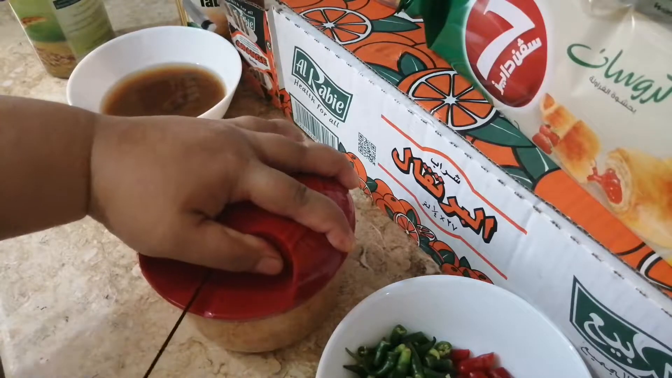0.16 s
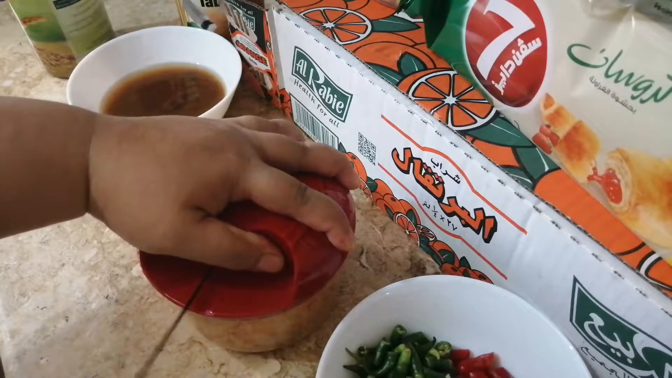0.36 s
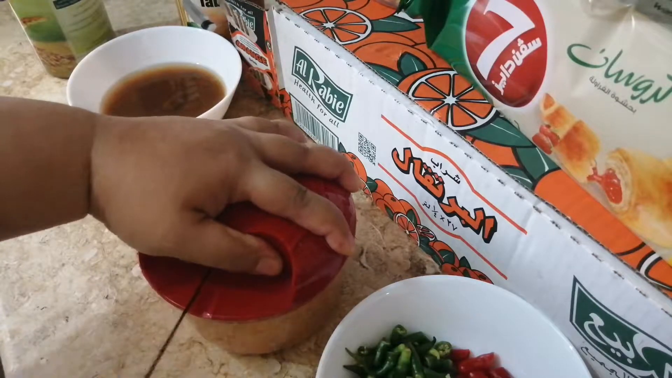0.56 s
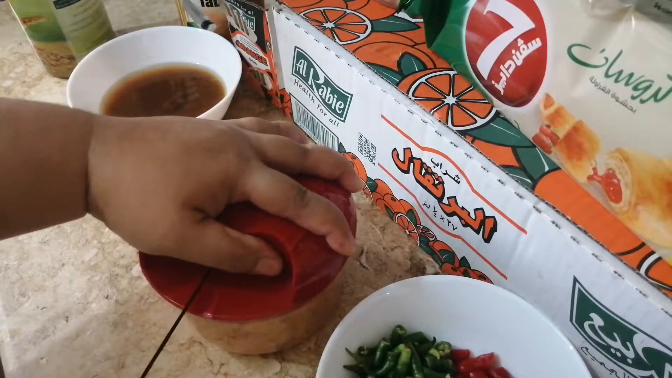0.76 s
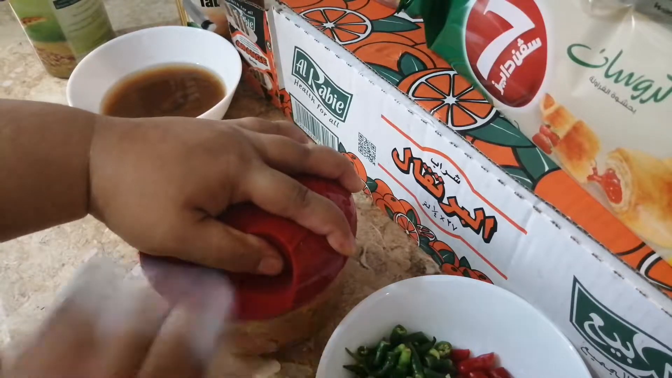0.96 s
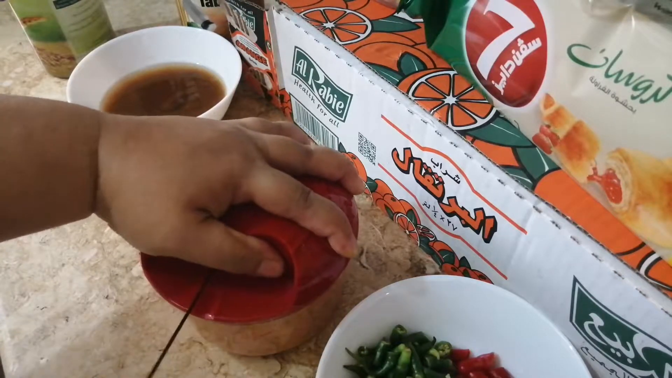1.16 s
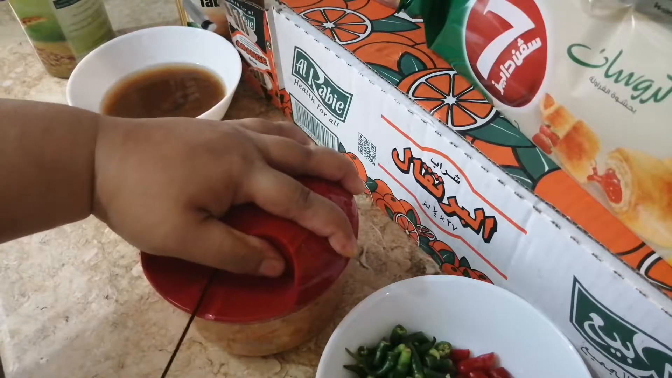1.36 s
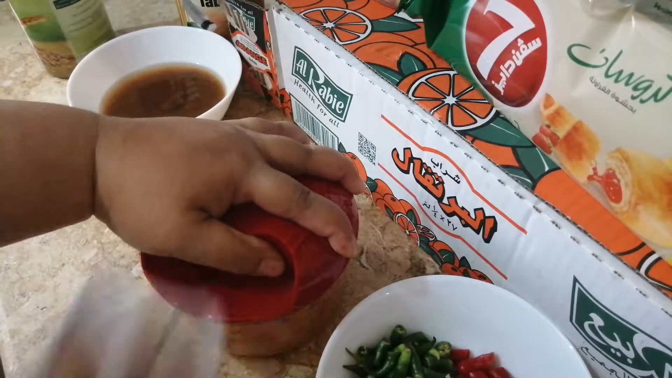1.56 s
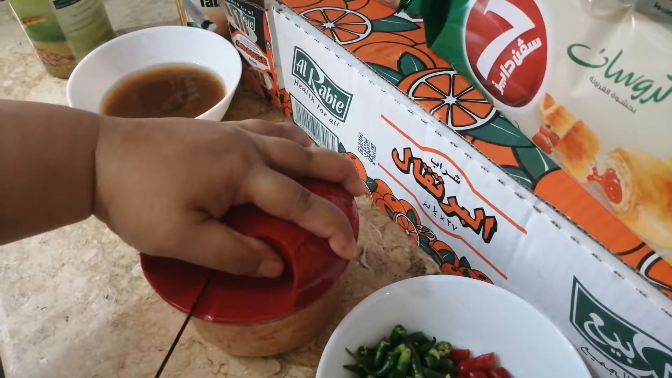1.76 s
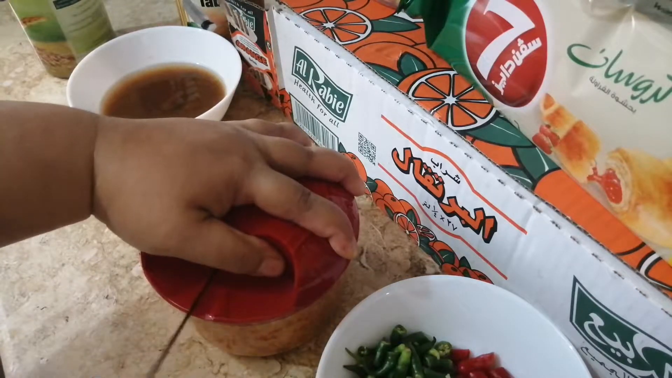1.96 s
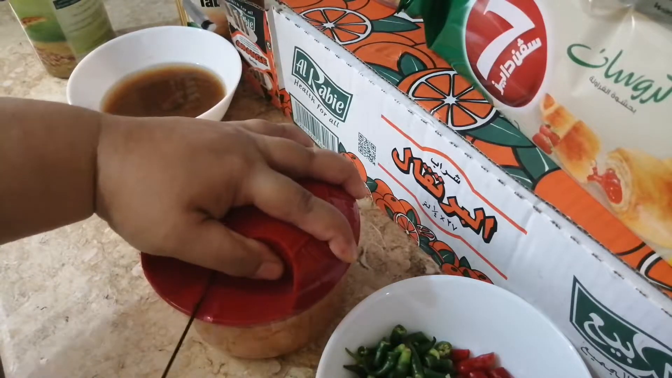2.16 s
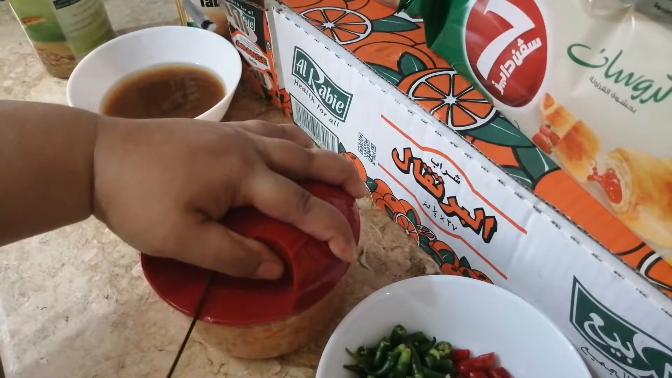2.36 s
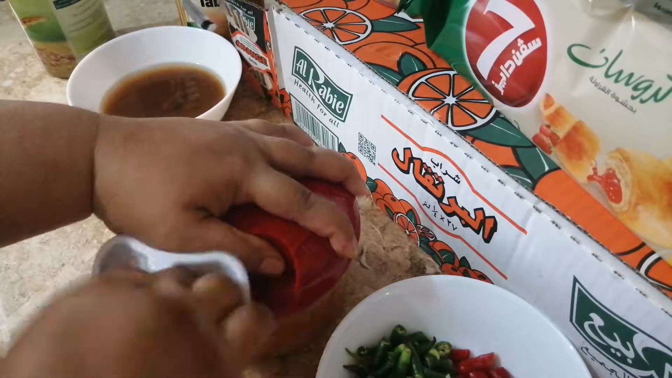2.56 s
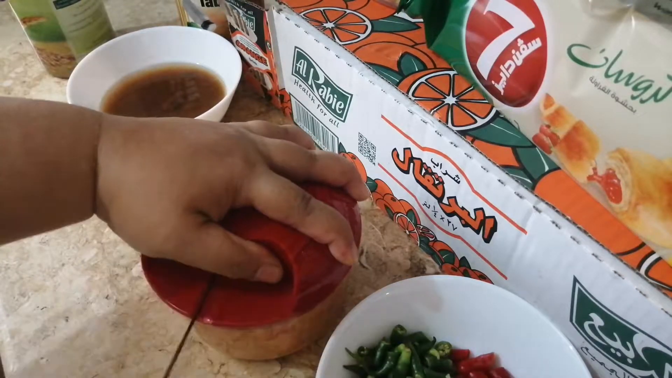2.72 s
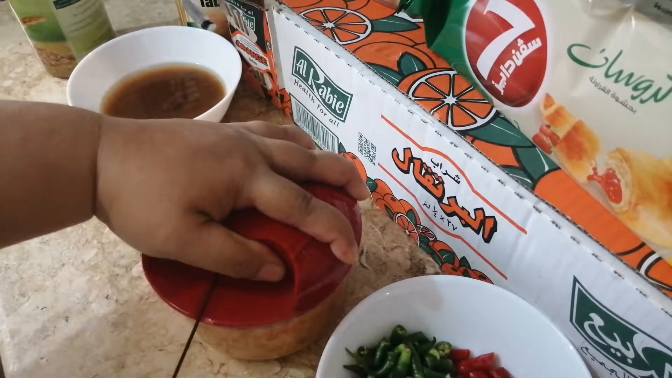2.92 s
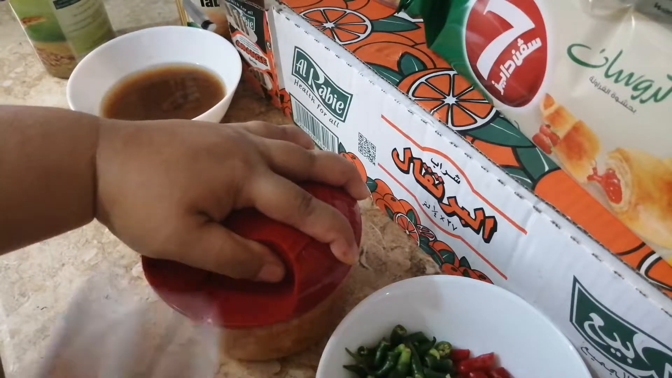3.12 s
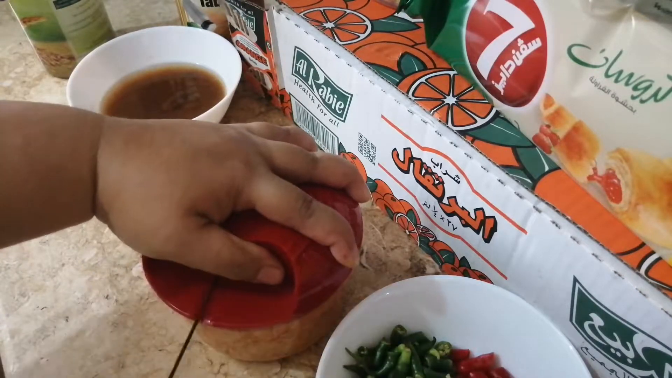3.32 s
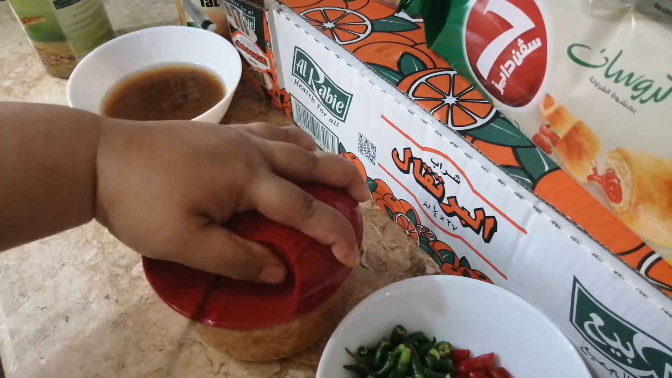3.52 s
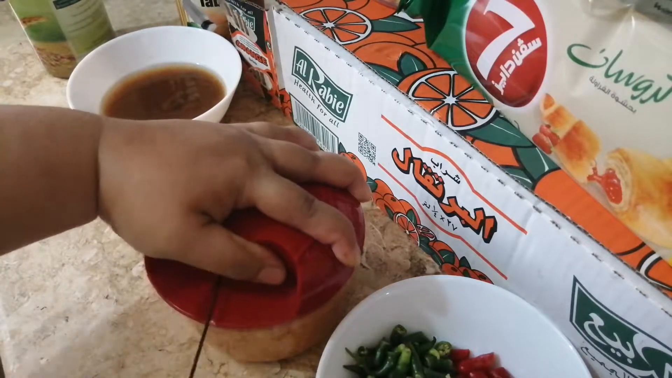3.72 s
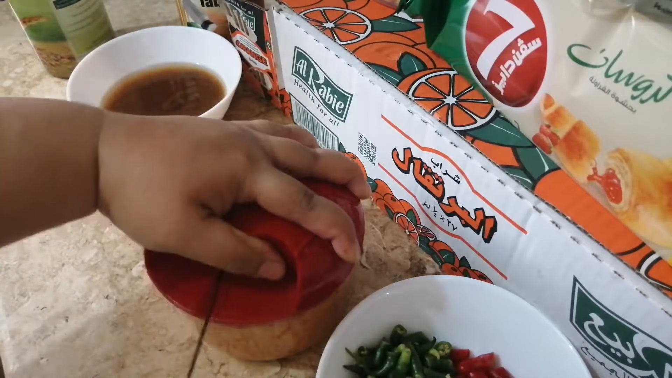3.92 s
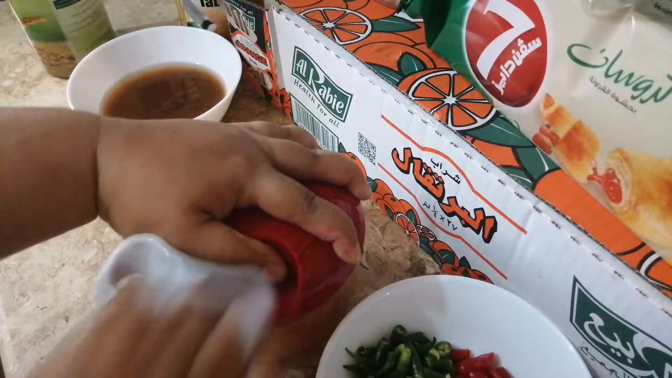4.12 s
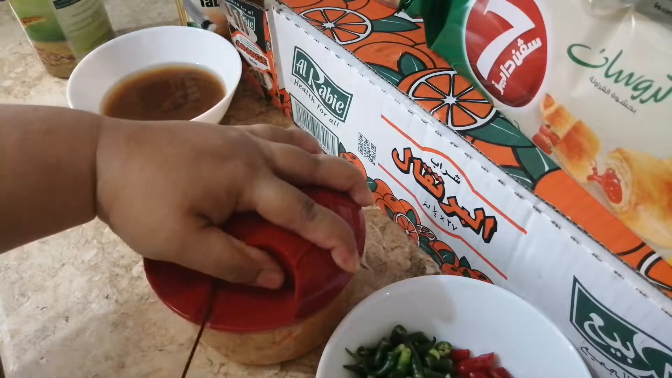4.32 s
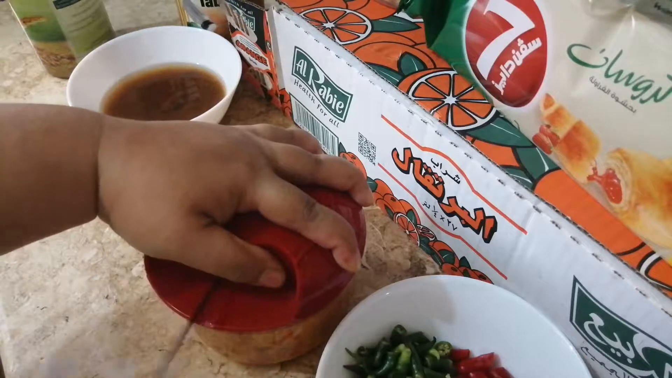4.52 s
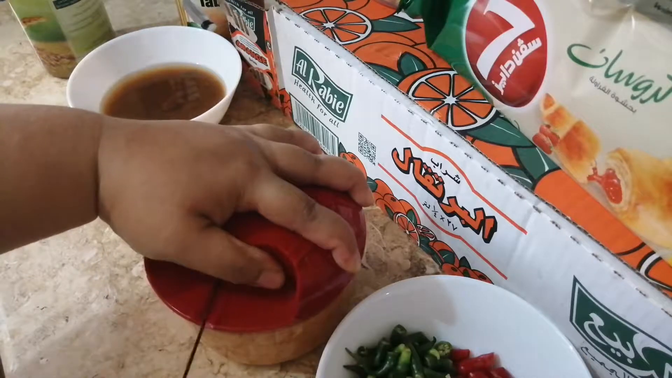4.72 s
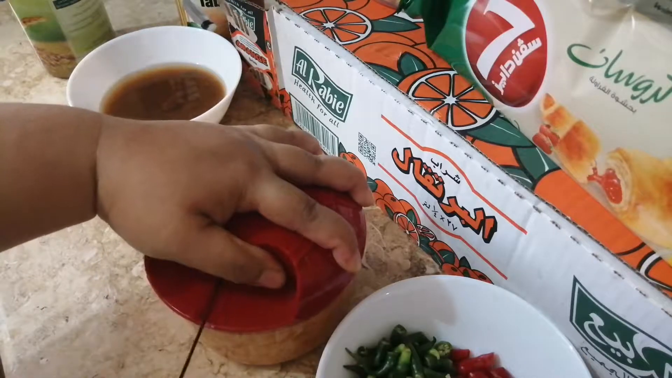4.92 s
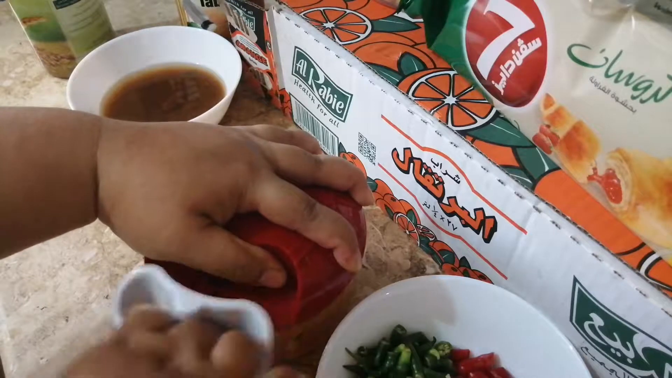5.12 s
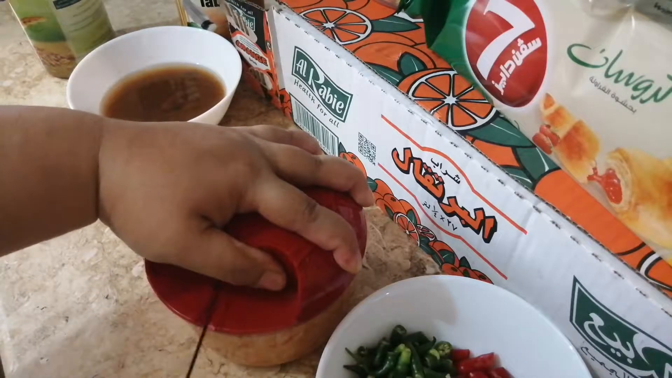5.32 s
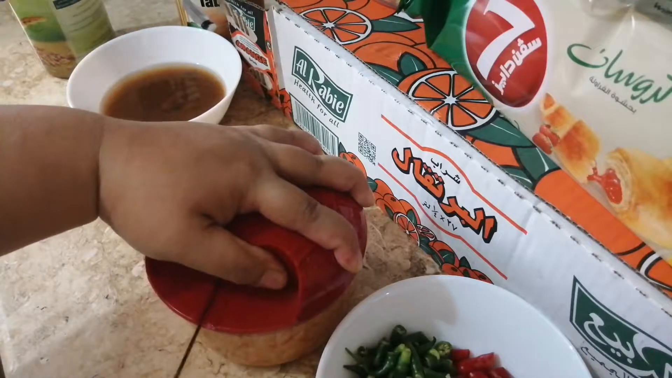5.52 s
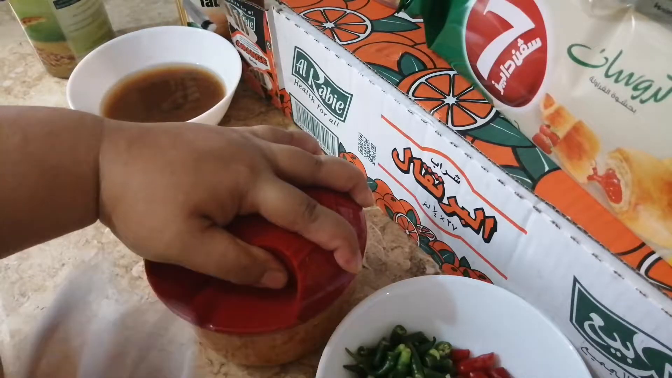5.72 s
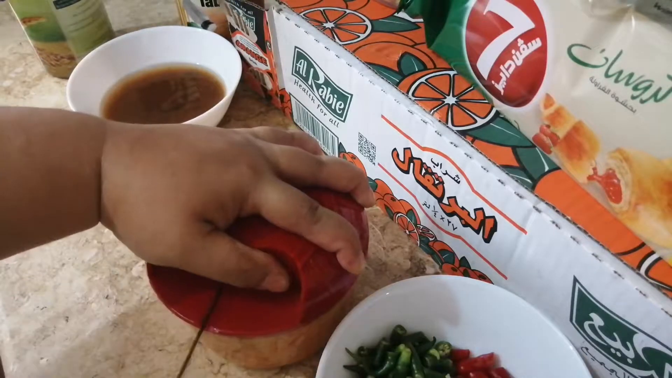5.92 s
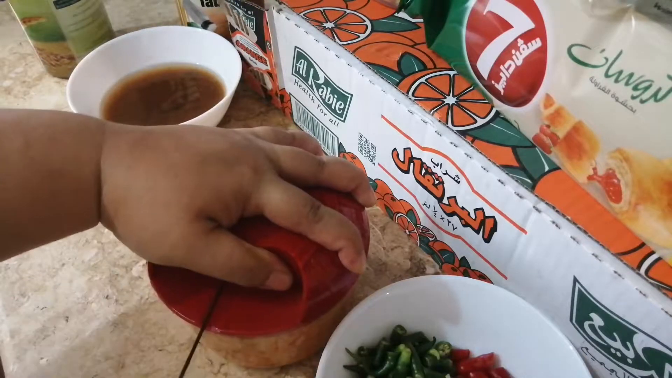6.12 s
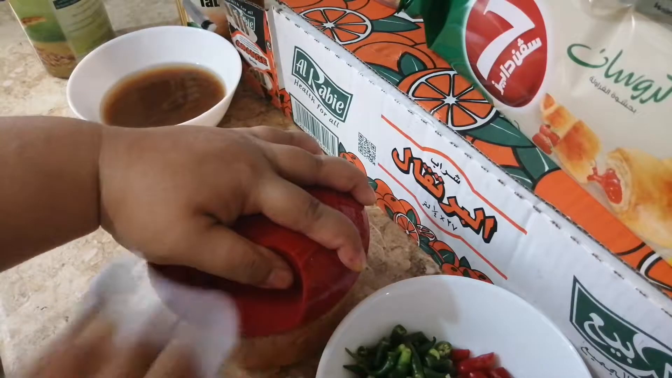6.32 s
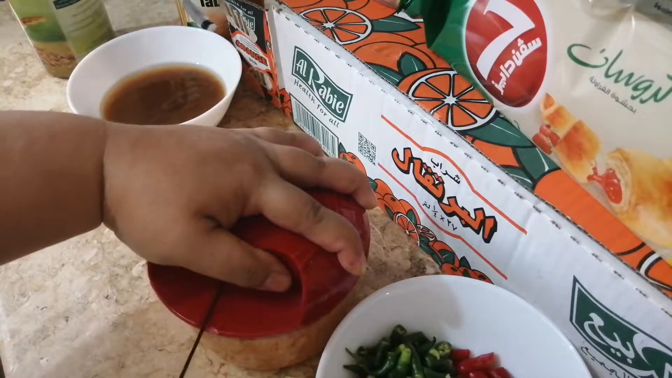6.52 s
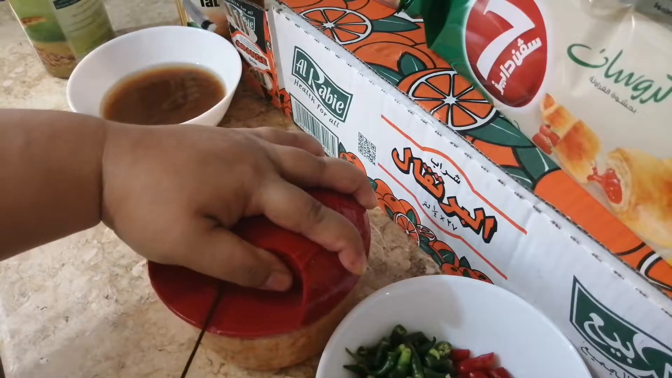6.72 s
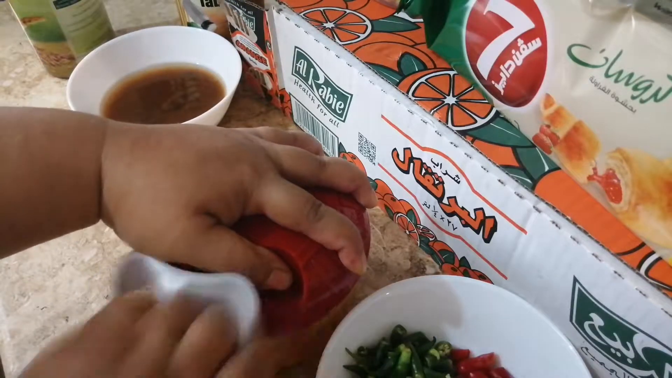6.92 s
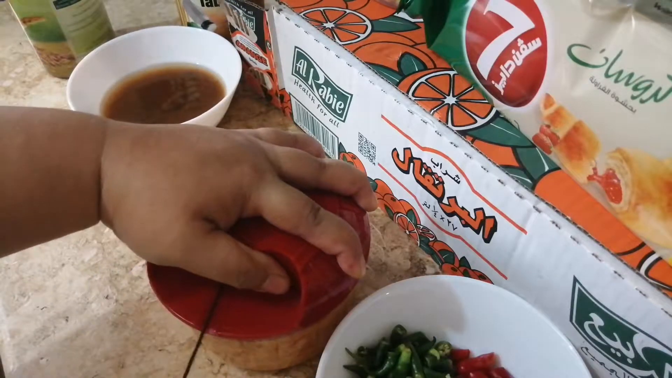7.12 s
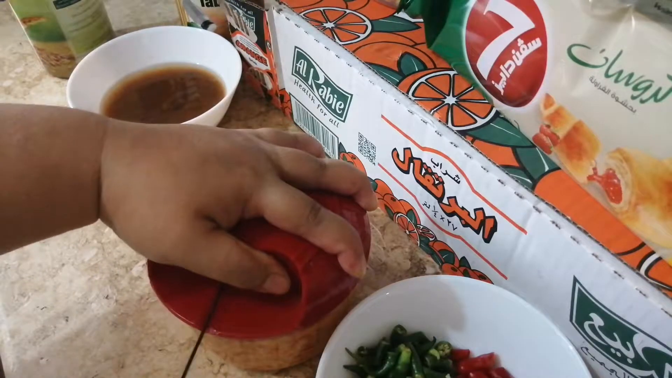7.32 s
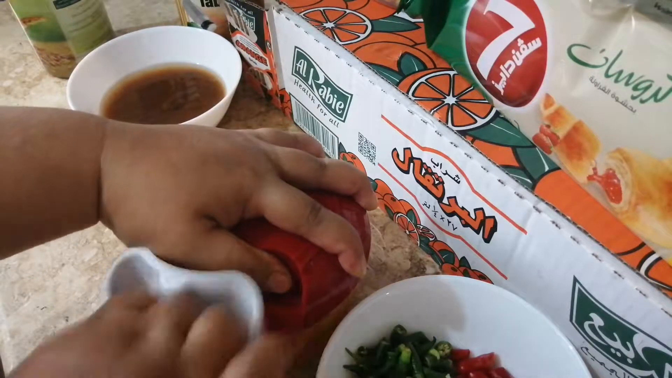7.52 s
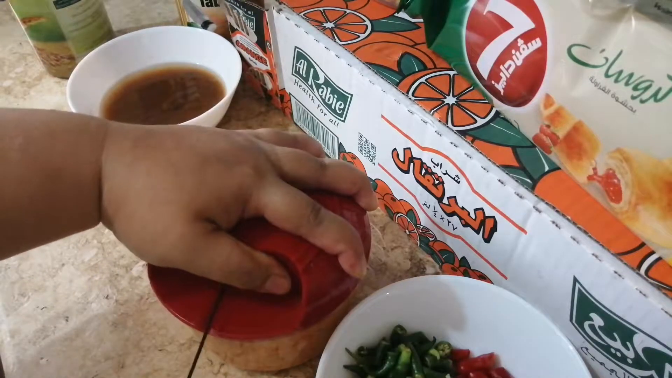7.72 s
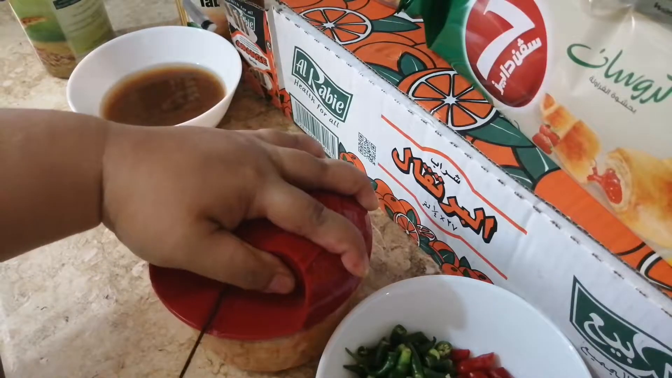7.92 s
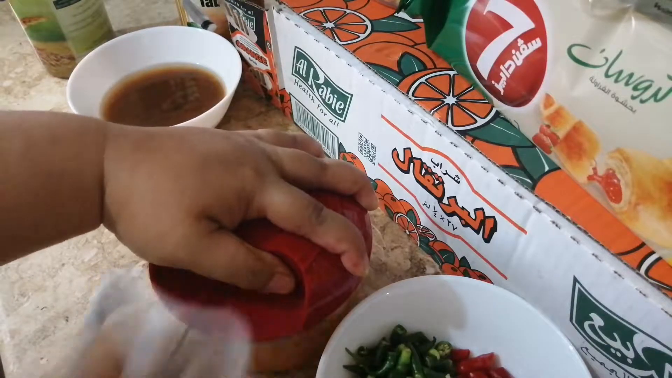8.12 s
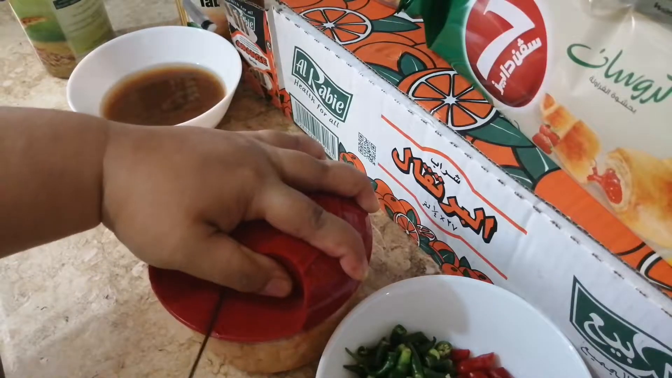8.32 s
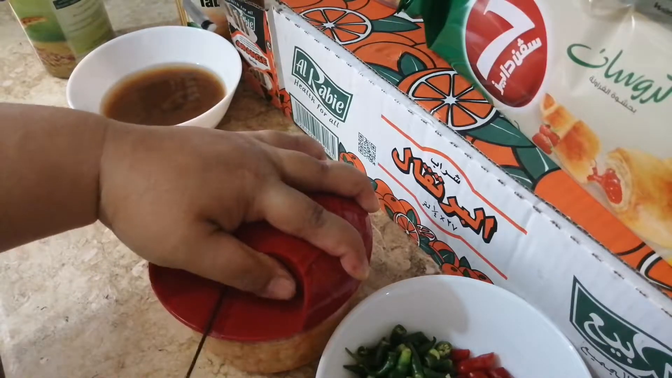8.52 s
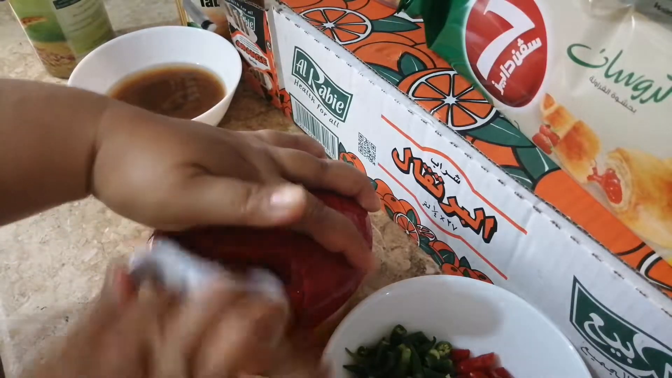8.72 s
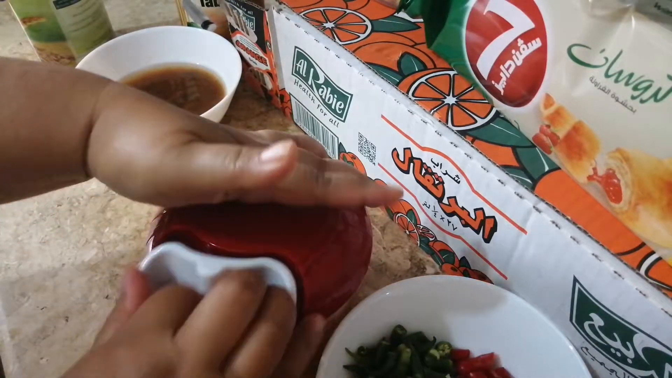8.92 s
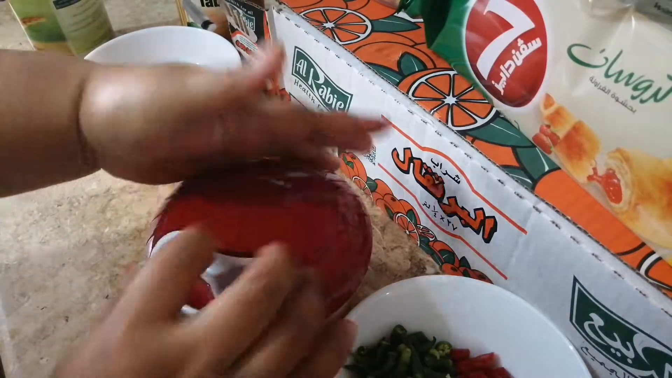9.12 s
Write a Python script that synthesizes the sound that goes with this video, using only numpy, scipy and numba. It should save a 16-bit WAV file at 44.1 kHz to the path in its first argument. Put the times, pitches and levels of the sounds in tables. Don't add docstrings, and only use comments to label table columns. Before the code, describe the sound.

A plastic hand-pulled chopper works close to the microphone on a stone counter, over a faint low kitchen hum. At 0 s it is already under load: a dull knock, cracks and a harsh rasp. Then yanks come about every 0.52 s until 5.2 s, each a gritty gear-and-cord rasp of about a quarter second with lumps knocking the bowl, followed by a lighter, brighter spring rewind, pawl rattle and sharp ratchet clicks. Sharp cracks stand out near 1.55 and 2.07 s; a cluster of dull thumps comes around 5.8 s. From 5.75 s strokes slow to about 0.6 s and the rewinds soften, with another crack at 6.95 s. The last pull starts at 8.15 s. At 8.78 s the loose handle rattles, then snaps hard into its seat at 9.0 s with a bright plastic ring, small aftertaps and a short hard-walled echo. The left is crisp, the right muffled.

```python
import sys
import numpy as np
from scipy import signal
from scipy.fft import rfft, irfft
from scipy.io import wavfile
from numba import njit

SR = 44100
rng = np.random.default_rng(int(sys.argv[2]) if len(sys.argv) > 2 else 0)


def gain_from_decibels(decibels):
    exponent = np.asarray(decibels, float) / 20
    return 10 ** exponent


def generate_wav(sig):
    pcm = np.round(np.clip(np.atleast_2d(sig).T, -1, 1) * 32767).astype(np.int16)
    wavfile.write(sys.argv[1], SR, pcm)


N = 408361

# [f/Hz, width/Hz, level/dB]
BOWL_MODES = [(92, 55, -10), (207.5, 57, 0), (359.4, 38, -3.5), (420.3, 37, -2), (648, 128, 0),
              (964, 127, -3.5), (1145, 75, -3.5), (1435, 540, -23)]
# [f/Hz, width/Hz, level/dB]
GEAR_MODES = [(1458, 280, 0), (1874, 470, -1), (2417, 565, -1), (2974, 176, 2.5), (3430, 545, -3.5)]
# [f/Hz, width/Hz, level/dB]
LID_MODES = [(4220, 850, -2.5), (5190, 348, 14), (5675, 330, 15), (6600, 760, 14.5), (7530, 1700, 1.5)]
# [f/Hz, width/Hz, level/dB]
FIZZ_MODES = [(8720, 1350, -6.5), (9950, 1470, -2), (11900, 1950, -3.5), (12900, 1500, -5.5),
              (14600, 930, 1.5), (15430, 700, -2), (16030, 500, -6)]
# [t/s, thump peak/dB, thump f/Hz, tick peak/dB]
CLUTCH_BITES = [(0.523, -38, 401, -36), (1.048, -32, 393, -41), (1.581, -39, 633, -50),
                (2.103, -41, 719, -50), (2.619, -36, 385, -42), (3.135, -39, 711, -38),
                (3.655, -35, 361, -37), (4.143, -40, 692, -35), (4.675, -40, 600, -50),
                (5.187, -36, 331, -35), (5.756, -40, 587, -42), (6.334, -41, 514, -48),
                (6.981, -40, 450, -50), (7.581, -38, 396, -50), (8.15, -38, 331, -35)]
# [t/s, peak/dB, middle part minus peak/dB, ring f/Hz]
RATCHET_SKIPS = [(0.8664, -29.5, -20, 6860), (1.4242, -32, -13, 5220), (2.4544, -32, -16, 5830),
                 (2.4753, -22, -19, 5200), (2.9823, -29, -15, 6350), (3.004, -22, -22, 6330),
                 (3.0245, -22, -13, 5100), (3.4828, -29, -16, 5410), (3.5232, -29, -14, 6740),
                 (3.9864, -31, -21, 6410), (4.0042, -22.5, -26, 5360), (4.4958, -23, -26, 5280),
                 (4.5144, -29, -23, 6420), (4.535, -26, -22, 5620), (4.5638, -29, -15, 3530),
                 (5.0266, -24.5, -17, 6360), (5.0719, -26.5, -8, 5170), (5.6058, -22, -12, 5000),
                 (6.1464, -29.5, -16, 6340), (6.1724, -29, -21, 5170), (6.2003, -22.5, -7, 5100),
                 (6.8359, -27, -17, 3520), (7.3736, -27.5, -17, 6510), (7.3936, -28, -17, 6460),
                 (7.417, -28.5, -20, 6340), (7.444, -27.5, -8, 5200), (7.4744, -31, -12, 6560),
                 (8.0175, -26, -8, 5100), (8.554, -21.5, -21, 6460), (8.6115, -26, -4, 6500)]
# [t/s, peak/dB]
SPRING_FREED = [(0.2997, -38), (0.8365, -40), (1.3553, -40), (1.8845, -39), (2.4024, -42), (2.9193, -39),
                (3.4094, -40), (3.9194, -38), (4.4283, -37), (4.9541, -39), (5.482, -39), (6.0472, -47),
                (6.6904, -44), (7.2994, -44), (7.885, -45), (8.465, -46)]


def level(x, db):
    return x * gain_from_decibels(db) / np.sqrt(np.mean(x ** 2))


@njit
def svf(x, hz, width, bend):
    y, band, low = np.empty(len(x)), 0., 0.
    tuned, damping = np.tan(np.pi * hz / SR), width / hz
    for i in range(len(x)):
        g = tuned * bend[i]
        v = (band + g * (x[i] - low)) / (1 + g * (g + damping))
        band = 2 * v - band
        low += 2 * g * v
        y[i] = damping * v
    return y


def ring(x, modes, bend=None):
    bend = np.ones(len(x)) if bend is None else bend
    out = np.zeros(len(x))
    for k, (hz, width, db) in enumerate(modes):
        out += (-1) ** k * gain_from_decibels(db) * svf(x, 1. * hz, 1. * width, bend)
    return out


def colour(x, points, size=4096):
    hz, db = np.transpose(points)
    bins_hz = np.arange(size // 2 + 1) * SR / size
    log_gain = np.interp(np.log(bins_hz + 1), np.log(hz), db) * np.log(10) / 20
    cepstrum = irfft(log_gain)
    cepstrum[1:size // 2] *= 2
    cepstrum[size // 2 + 1:] = 0
    return signal.fftconvolve(x, irfft(np.exp(rfft(cepstrum))))[:N]


def fade(x, tail_s):
    return signal.lfilter([1], [1, -np.exp(-1 / (SR * tail_s))], x)


def grains(rate, spread_db, tail_s, bed):
    hits = (rng.random(N) < rate / SR) * gain_from_decibels(spread_db * rng.exponential(size=N))
    return bed + level(fade(hits, tail_s), 0)


def wander(x, modes, patchy_db, rate, drift=.03):
    drive_at, slide_at = np.arange(N) * rate / SR, np.arange(N) * 9 / SR
    drives = gain_from_decibels(patchy_db * rng.standard_normal((len(modes), 1000)))
    slides = 1 + drift * rng.standard_normal((len(modes), 1000))
    knots = np.arange(1000)
    out = np.zeros(N)
    for k, (mode, drive, slide) in enumerate(zip(modes, drives, slides)):
        ringing = ring(x, [mode], np.interp(slide_at, knots, slide))
        out += (-1) ** k * ringing * np.interp(drive_at, knots, drive)
    return level(out, 0)


def strikes(times, db, modes, burst_s):
    out, t = np.zeros(N + 2048), np.arange(2048) / SR
    noise = rng.standard_normal((len(times), 2048))
    noise[:, :3] = [2.2, -1.2, .6]
    for s, peak_db, shape, rough in zip(times, db, modes, noise):
        hit = ring(rough * np.exp(-t / burst_s), shape)
        start = int(s * SR)
        out[start:start + 2048] += hit * gain_from_decibels(peak_db) / np.abs(hit).max()
    return out[:N]


def room_hum():
    # [f/Hz, level/dB per Hz]
    hum_points = [(15, -40), (45, 8), (130, 12), (410, 3), (1450, -6.5), (1620, 6), (3090, -6), (3830, -37),
                  (6550, -3), (8350, -27), (15500, -32)]
    return [level(colour(noise, hum_points), -67.5) for noise in rng.standard_normal((2, N))]


def echoes(x):
    t60_s, treble_t60_s, split_hz, first_echo_s = 0.73, 0.34, 5900, 0.0074
    t = np.arange(SR) / SR
    noise = rng.standard_normal((2, SR))
    dull = signal.sosfilt(signal.butter(2, split_hz, fs=SR, output="sos"), noise)
    tail = dull * gain_from_decibels(-60 * t / t60_s) + (noise - dull) * gain_from_decibels(-60 * t / treble_t60_s)
    tail = tail * np.clip(t / first_echo_s - .5, 0, 1)
    tail = tail / np.sqrt(np.mean(np.sum(tail ** 2, axis=1)))
    return signal.fftconvolve(x[None], tail, axes=1)[:, :N]


def snap():
    # [t/s, peak/dB]
    handle_hits = [(8.781, -44), (8.803, -31), (8.806, -34), (8.824, -46), (8.837, -48), (8.853, -54),
                   (8.8994, -40.5), (8.919, -49), (8.9958, -35), (9.0023, -24.5), (9.005, -17.5),
                   (9.012, -23.5), (9.017, -26.5), (9.022, -31), (9.031, -34), (9.077, -41), (9.135, -42)]
    # [f/Hz, width/Hz, level/dB]
    seated = [(450, 750, -12.5), (1580, 220, -1.5), (1930, 250, -1), (2450, 350, -2.5), (3200, 150, 3),
              (3650, 200, -1), (4140, 400, -5), (4680, 150, -0.5), (5130, 150, 13), (5680, 150, 3.5),
              (6140, 550, -0.5), (7010, 130, 3), (7750, 340, -7), (12800, 9900, -17.5)]
    seat_s = 9.0
    s, db = np.transpose(handle_hits)
    wide = [(hz, width + 260, min(top, 4.5)) for hz, width, top in seated]
    loose = [(1140, 180, 3), (1520, 250, -3), (2400, 500, -2), (3100, 280, 0), (3800, 500, -4),
             (4550, 300, 2), (5050, 300, -2), (5650, 300, -4), (6700, 400, 0), (11900, 5000, -16.0)]
    thrown = strikes(s, db, [wide] * len(s), burst_s=0.0045)
    direct = strikes(s, db + 0.5, [seated if t > seat_s else loose for t in s], burst_s=0.0024)
    return direct + 0.88 * thrown, thrown


def catches():
    # [t/s, peak/dB, ring f/Hz]
    tooth_catches = [(0.0772, -29, 2300), (0.5801, -41, 2960), (1.096, -36, 3090), (1.4077, -39, 1600),
                     (2.4753, -35, 3740), (2.6668, -40, 3410), (3.1373, -42, 1500), (3.203, -35, 3130),
                     (3.5024, -31, 2220), (3.526, -30, 3040), (3.5483, -31, 3550), (3.722, -31, 2590),
                     (3.7574, -26, 2220), (4.191, -33, 1580), (4.4757, -41, 3450), (4.5367, -30, 3500),
                     (4.7172, -35, 2300), (5.1871, -38, 2190), (5.5458, -33, 3490), (5.5585, -26.5, 2840),
                     (6.2006, -41, 3110), (6.4108, -35, 3570), (6.9383, -29, 2270), (7.1556, -31, 2340),
                     (7.47, -33, 3330), (7.9674, -45, 1510), (8.1923, -35, 3290), (8.78, -43, 1510),
                     (8.837, -41, 2520), (1.075, -41, 5000), (4.1869, -34, 4770), (4.2182, -38, 2590),
                     (4.6763, -38, 2700), (4.8878, -39, 3580), (5.2609, -47, 2300), (5.6062, -40, 3480),
                     (6.426, -28, 4830), (6.7695, -38, 3410), (7.067, -33, 2320), (8.0185, -41, 2600),
                     (8.151, -35, 2980), (8.152, -37, 1600), (0.5185, -44, 5600), (2.496, -32, 5200),
                     (5.731, -40, 6800), (8.221, -36, 3200)]
    s, db, hz = np.transpose(tooth_catches)
    modes = [[(f, 260, 0), (5300, 1500, -9), (1200, 900, -12)] for f in hz]
    return strikes(s, db + 2.0, modes, burst_s=0.0029)


def ticks():
    # [t/s, peak/dB, dull minus peak/dB,
    # middle minus peak/dB, ring f/Hz]
    cracks = [(0.0379, -23.5, -4, -7, 5900), (0.109, -23.5, -3, -8, 6050), (0.5924, -23, -9, -20, 6040),
              (1.084, -34, -14, -20, 6410), (1.096, -25, -15, -23, 5330), (1.5552, -16, -20.5, -12, 6800),
              (2.0731, -20, -22, -12, 6900), (2.155, -25.5, -6, -9, 5840), (3.8335, -27, -11, -17, 5470),
              (4.8533, -26.5, -18, -6, 5940), (5.884, -28, -22, -24, 6600), (6.9377, -41, -1, 11.5, 3320),
              (6.95, -21, -18, -5.5, 6800), (0.326, -33.5, 2.5, -2, 6000), (0.582, -31, 1, -16, 6000),
              (8.5814, -28, -22, -24, 6350)]
    # [peak/dB, dull minus peak/dB, middle minus peak/dB, ring f/Hz]
    let_go = (-46, -11, -25, 6800)
    # [dull minus peak/dB, middle minus peak/dB, ring f/Hz]
    bite_shape = (-5, -14, 6000)
    skip_dull_db = -17
    skips = [(s, db - 0.5, skip_dull_db, middle_db, hz) for s, db, middle_db, hz in RATCHET_SKIPS]
    releases = [(s, *let_go) for s, _ in SPRING_FREED]
    bites = [(s, db + 2.0, *bite_shape) for s, _, _, db in CLUTCH_BITES]
    return np.transpose(cracks + skips + releases + bites)


def clicks():
    s, db, dull_db, middle_db, part_hz = ticks()
    lid = LID_MODES + [(hz, width, top - 8.5) for hz, width, top in FIZZ_MODES] + [(3020, 760, 3.0)]
    modes = [lid + [(hz, 220.0, 19.0)] for hz in part_hz]
    sharp = strikes(s, db + 1.5, modes, burst_s=.001)
    middle = strikes(s, db + middle_db + 2.5, [GEAR_MODES] * len(s), burst_s=0.0022)
    dull = strikes(s, db + dull_db + 3.0, [BOWL_MODES[2:]] * len(s), burst_s=0.00042)
    return sharp + middle + dull


def knocks():
    # [t/s,
    # peak/dB, f/Hz]
    dull_knocks = [(0.035, -25, 684), (0.338, -31, 202), (0.836, -50, 383), (1.074, -32, 607),
                   (1.108, -23.5, 240), (1.633, -31, 246), (1.93, -36, 450), (2.153, -37, 227),
                   (2.433, -33, 384), (2.947, -50, 624), (3.194, -32, 211), (3.461, -31, 360),
                   (4.474, -39, 666), (4.969, -51, 234), (5.226, -46, 223), (5.803, -36, 401),
                   (5.822, -26, 361), (5.831, -28, 570), (5.843, -23, 623), (5.856, -28, 634),
                   (5.811, -35, 1100), (5.904, -37, 217), (5.82, -25, 1170), (5.834, -31, 1150),
                   (6.147, -47, 208), (6.385, -31, 553), (6.409, -28.5, 410), (6.864, -28, 365),
                   (7.369, -32, 183), (8.522, -44, 243), (8.7809, -38, 1410), (8.783, -42, 431),
                   (8.838, -47, 300), (8.9, -48, 550), (8.963, -57, 400), (9.018, -38, 444),
                   (9.03, -48, 397), (9.045, -49, 500), (9.135, -60, 400),
                   (0.563, -42, 423), (0.929, -27, 436), (1.373, -37.5, 204), (1.553, -38, 1150),
                  (1.929, -32, 444), (2.646, -46, 339), (3.179, -32, 690), (3.482, -39, 202),
                  (3.501, -35, 676), (3.524, -32.5, 299), (4.495, -45, 633), (4.533, -40, 729),
                  (4.651, -39, 213), (5.261, -42, 231), (5.556, -32, 360), (5.579, -35, 640),
                  (5.605, -35, 340), (5.677, -43, 651), (6.935, -36, 1140), (7.468, -33.5, 296),
                  (7.967, -38, 202), (8.017, -43, 377), (8.23, -37, 641), (8.299, -31, 248),
                  (1.149, -31, 280), (5.63, -36, 400), (5.79, -31, 380), (8.58, -43, 398), (8.63, -41, 380),
                  (2.455, -34, 800), (2.965, -36, 704), (2.983, -29, 804), (5.533, -38, 1130),
                  (6.2, -34, 397), (7.394, -40, 605), (7.444, -40, 500), (8.198, -43, 678),
                  (8.265, -37, 350), (8.291, -29, 750), (8.326, -34, 700), (8.34, -29, 746)]
    bites = [(s + .002, db + 5, hz) for s, db, hz, _ in CLUTCH_BITES]
    s, db, hz = np.transpose(dull_knocks + bites)
    modes = [[(f, 0.26 * f, 0), (min(2.0 * f, 1500), 0.85 * min(f, 600), -6.0), (1300, 700, -12.0)]
             for f in hz]
    return strikes(s, db + 2.5, modes, burst_s=.0012)


def cord():
    # [t/s, rasp at full speed/dB, up to speed/share of stroke, slows/share, rasp when it stops/dB]
    pulls = [(-0.02, -43, 0.17, 0.63, -60), (0.525, -42.5, 0.23, 0.63, -63), (1.05, -41, 0.17, 0.65, -59),
             (1.582, -42, 0.27, 0.7, -59), (2.101, -42, 0.27, 0.64, -60.5), (2.618, -42.5, 0.25, 0.73, -62),
             (3.136, -41, 0.29, 0.72, -60), (3.654, -41.5, 0.2, 0.72, -60.5),
             (4.142, -41.5, 0.3, 0.75, -57.5), (4.671, -42, 0.22, 0.72, -59.5),
             (5.189, -41, 0.29, 0.74, -60), (5.751, -43.5, 0.19, 0.63, -65), (6.334, -43.5, 0.31, 0.7, -69),
             (6.982, -43.5, 0.35, 0.72, -62.5), (7.58, -43.5, 0.37, 0.74, -64),
             (8.152, -43.5, 0.28, 0.67, -66.5)]
    # [t/s, rasp at full speed/dB, fastest/share, rasp when it stops/dB, bowl rattle/dB]
    returns = [(0.278, -43, 0.5, -53.5, -6), (0.824, -41.5, 0.4, -55.5, -6.5),
               (1.337, -43, 0.31, -53.5, -5.5), (1.865, -41.5, 0.19, -56, -5),
               (2.391, -43.5, 0.2, -56.5, -5), (2.901, -43.5, 0.21, -54.5, -5.5),
               (3.399, -44.5, 0.23, -56.5, -4), (3.907, -43, 0.2, -56, -5.5),
               (4.404, -44.5, 0.26, -54.5, -4.5), (4.936, -43, 0.38, -55, -4),
               (5.459, -44.5, 0.35, -59.5, -5.5), (6.039, -46.5, 0.35, -59, -4.5),
               (6.677, -46, 0.34, -55.5, -3), (7.281, -46.5, 0.4, -60.5, -5.5),
               (7.868, -47, .38, -60.5, -3), (8.446, -48, 0.26, -66, -2)]
    food_load = (0.7, 0.51, 0.92, 0.64, 0.11, 0.21, -0.6, -0.8, -0.017, -0.3, -1.1, 0.47, 0.4, 0.34, 0.67,
                 0.71)
    # [t after the turn/s, rasp/dB, share of the scrape]
    scrape_corners = [
        (-.004, -4, 0),
        (0, -3.5, 1),
        (.009, -0.5, .8),
        (0.013, -2, 0),
    ]
    scrape_levels = (1, 4, 5, 7, 4, 6.5, 12, 6, 3, 8, 4, -2, 2, 7, 9, -5)
    rest_s, slack_s, jump_s = 8.765, 0.0287, 0.0034
    pull_bowl_db, pull_gear_db = np.array([2.9, 1.77, 1.6, 3.05, 1.6]), (-2, -4.5, -5.5, -4, -5.5)
    back_bowl_db, back_gear_db = np.array([-1, 4, 1]), np.array([-13.5, -6, -6])
    rows, rest_db = [], -55
    ends = [pull[0] for pull in pulls[1:]] + [rest_s]
    strokes = zip(pulls, returns, ends, food_load, SPRING_FREED, scrape_levels)
    for pull, back, end, load_db, (free, _), scrape_db in strokes:
        s, db, rise, slow, stop_db = pull
        turn, back_db, fast, home_db, rattle_db = back
        shares = (rise, (rise + slow) / 2, slow, 1)
        at = [s + slack_s] + [s + share * (turn - s) for share in shares]
        rasp = (rest_db, db - 2, db, db - 3.5, stop_db)
        rows += zip(at, rasp, load_db + pull_bowl_db, pull_gear_db)
        bite_in = s + 0.516 * rise * (turn - s)
        rows.append((bite_in, db - 7.5, load_db + pull_bowl_db[0], pull_gear_db[1]))
        rows += [(free - jump_s, stop_db, 2.5, -4), (free, back_db - 8, -4, -9)]
        at = [turn + share * (end - turn) for share in (0.19, fast, 0.72)]
        rasp = back_db + np.array([-1.4, 0, -5.5])
        rows += zip(at, rasp, rattle_db + back_bowl_db, 0.55 * rattle_db + back_gear_db)
        rows.append((end - slack_s, home_db, rattle_db - 3.0, rattle_db - 8.0))
        rows.append((at[0] - jump_s, back_db - 2, rattle_db - 3, -9))
        for lag, still_db, share in scrape_corners:
            gear_db = rattle_db - 5.5 + share * 5.5
            rows.append((end + lag, home_db + still_db + share * scrape_db, rattle_db + 2.0, gear_db))
        rest_db = home_db
    return np.array(sorted(rows)).T


def spinning():
    # [f/Hz, width/Hz, level/dB]
    counter_modes = [(45.6, 25, -7), (91, 31, 2.5), (203.8, 20.5, 11.5), (401, 78, 3.5), (840, 190, 8.5),
                     (1130, 360, 0)]
    # [f/Hz, width/Hz, level/dB]
    spring_modes = [(7060, 180, 14.5), (8160, 660, 4)]
    # [f/Hz, width/Hz, level/dB]
    pawl_modes = [(960, 110, -3), (1145, 100, 2), (1550, 160, -2), (3450, 240, -4.5)]
    t = np.arange(N) / SR
    s, *columns = cord()
    rasp_db, bowl_db, gear_db = (np.interp(t, s, column) for column in columns)
    rasp_db = rasp_db - 300 * np.clip(t - s[-1], 0, 1)
    skips = np.bincount((np.array(RATCHET_SKIPS)[:, 0] * SR).astype(int), minlength=N)
    rasp_db = rasp_db + 4.5 * fade(skips, tail_s=.006)
    lumps = grains(rate=500, spread_db=-0.5, tail_s=0.00076, bed=1.0)
    teeth = grains(rate=470, spread_db=1.2, tail_s=0.0023, bed=2.2) + 0.22 * lumps
    air, stone, grit = rng.standard_normal((3, N))
    bowl = wander(lumps * air, BOWL_MODES, patchy_db=1.0, rate=45) * gain_from_decibels(bowl_db)
    rasp = wander(teeth * grit, LID_MODES, patchy_db=0.5, rate=90)
    chatter = wander((teeth + .5 * lumps) * grit, GEAR_MODES, patchy_db=2, rate=50, drift=.02) * gain_from_decibels(gear_db)
    fizz = wander(teeth * grit, FIZZ_MODES, patchy_db=1, rate=6, drift=0.0055)
    fizz = fizz * gain_from_decibels(-11.0 + 0.13 * (rasp_db + 45.0))
    rewind = np.clip((-5.5 - gear_db) / 1.5, 0, 1)
    spring = rewind * wander(teeth * air, spring_modes, patchy_db=-2.0, rate=100) * gain_from_decibels(-7.0)
    rattles = grains(rate=160, spread_db=0.5, tail_s=0.0018, bed=0.89)
    pawl = rewind * wander(rattles * stone, pawl_modes, patchy_db=4.5, rate=40) * gain_from_decibels(bowl_db - 7.0)
    bright = rasp + spring + pawl + gain_from_decibels(2.0) * chatter + fizz
    base = wander((lumps + 3.9) * stone, counter_modes, patchy_db=1.5, rate=25, drift=0.042)
    base = base * gain_from_decibels(bowl_db + 2.0)
    base = base + level(ring(teeth * stone, GEAR_MODES + pawl_modes), 1.6) * gain_from_decibels(gear_db)
    return gain_from_decibels(rasp_db) * gain_from_decibels(4.5) * (bowl + bright), gain_from_decibels(rasp_db - 3.9 * rewind) * base


def scene():
    # [f/Hz, level/dB]
    shadow_points = [(100, -1), (300, -3), (1000, -8), (3000, -2.5)]
    air, base = spinning()
    thumps = knocks()
    handle, thrown = snap()
    near = air + clicks() + catches() + thumps
    kitchen = echoes(gain_from_decibels(-12.5) * near + gain_from_decibels(-7) * thrown)
    hum = room_hum()
    left = near + handle + 0.3 * base + kitchen[0] + hum[0]
    right = colour(0.76 * near, shadow_points) + 0.078 * thumps + 0.79 * handle + base
    right = right + 0.29 * kitchen[1] + 0.71 * hum[0] + 0.29 * hum[1]
    return np.array([left, right])


def low_pass(x):
    return signal.sosfilt(signal.butter(12, 15750, fs=SR, output="sos"), x)


def record(dry):
    # [f/Hz, level/dB]
    cover_points = [(60, -2.5), (200, -2.5), (400, 1.5), (700, -6), (1300, -10), (2400, -22), (4400, -51.5),
                    (8000, -147), (15000, -16)]
    covered = colour(colour(dry[1], cover_points), [(7000, 1), (15000, -22)])
    covered = np.roll(covered, -6)
    return low_pass(np.array([dry[0], covered]))


dry = scene()
out = record(dry)
generate_wav(out)
```